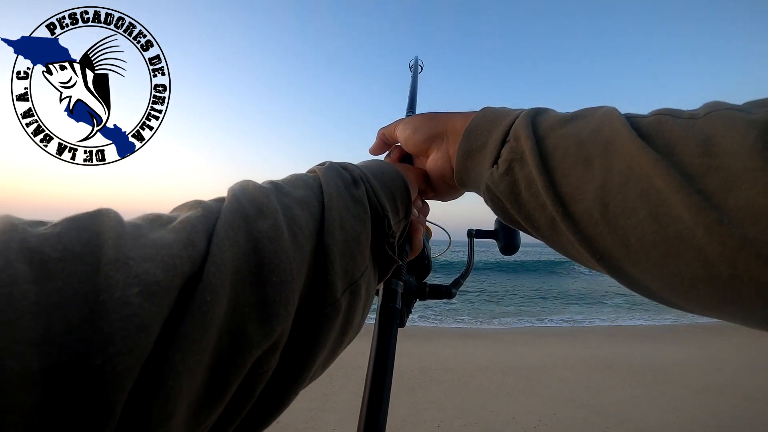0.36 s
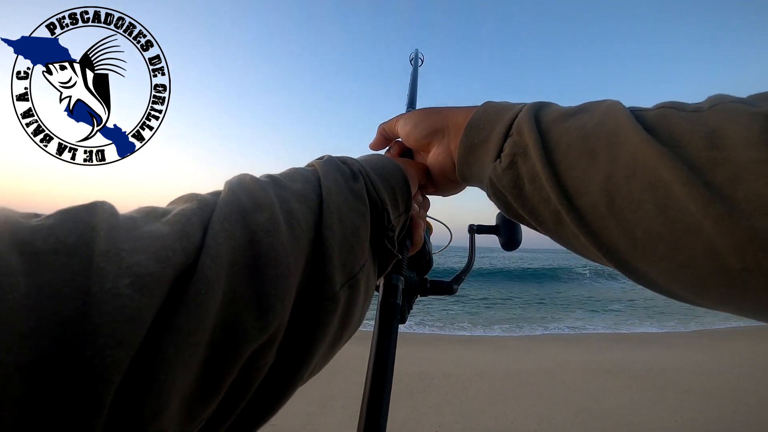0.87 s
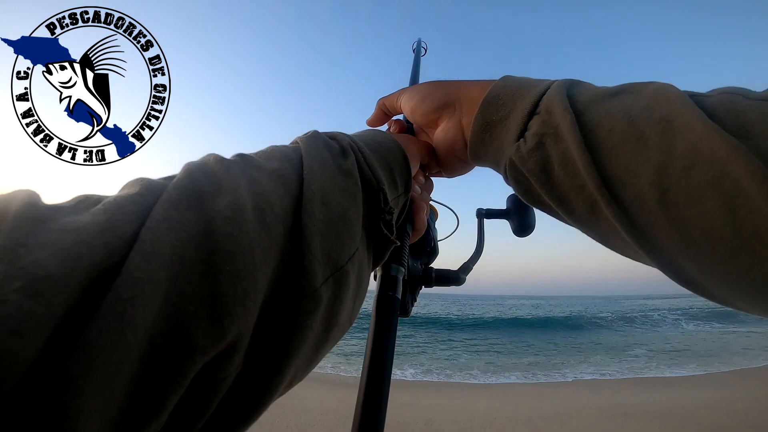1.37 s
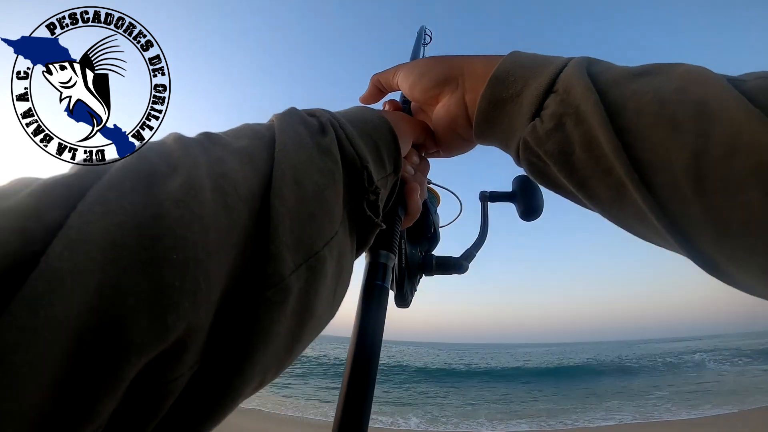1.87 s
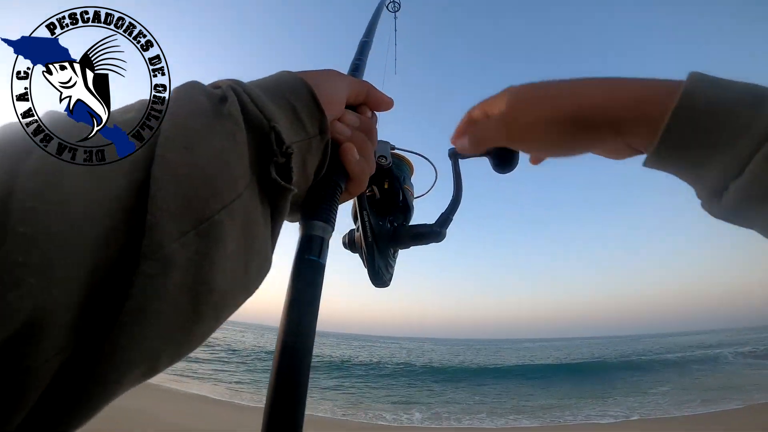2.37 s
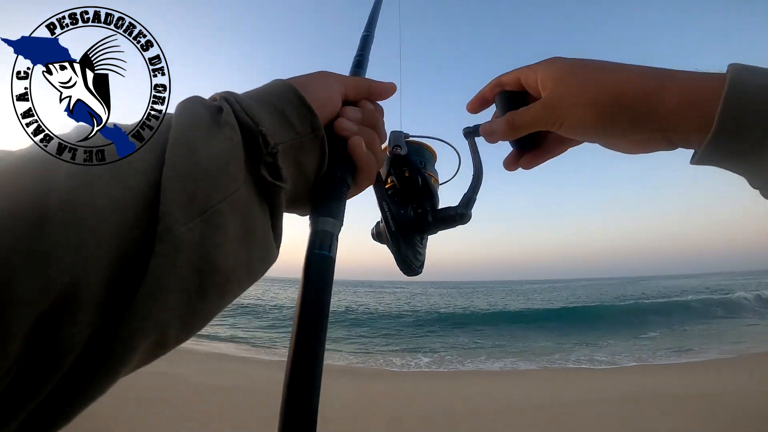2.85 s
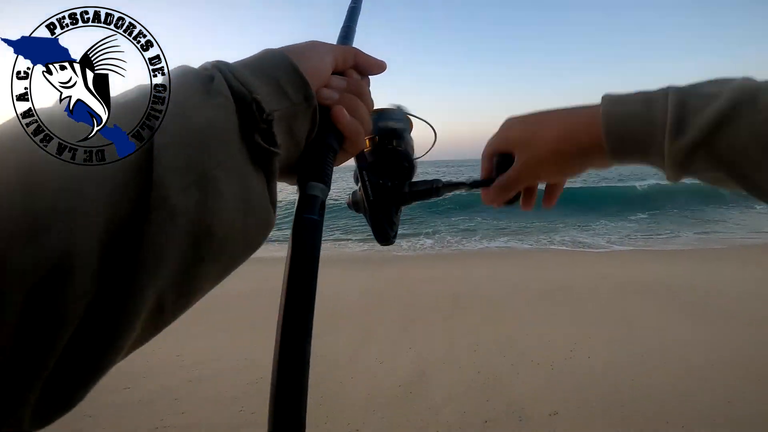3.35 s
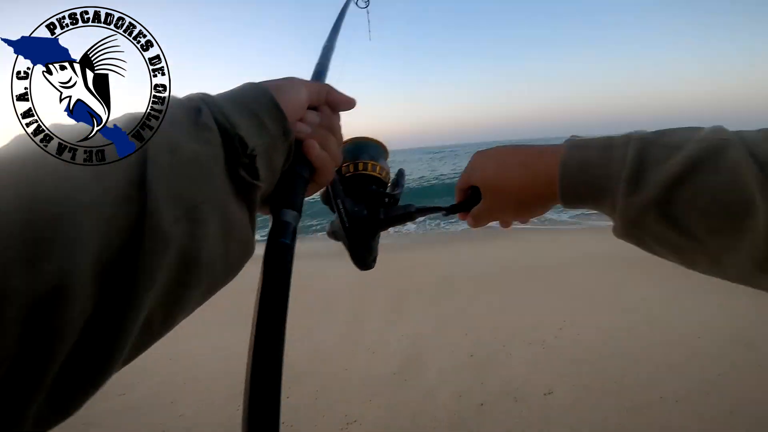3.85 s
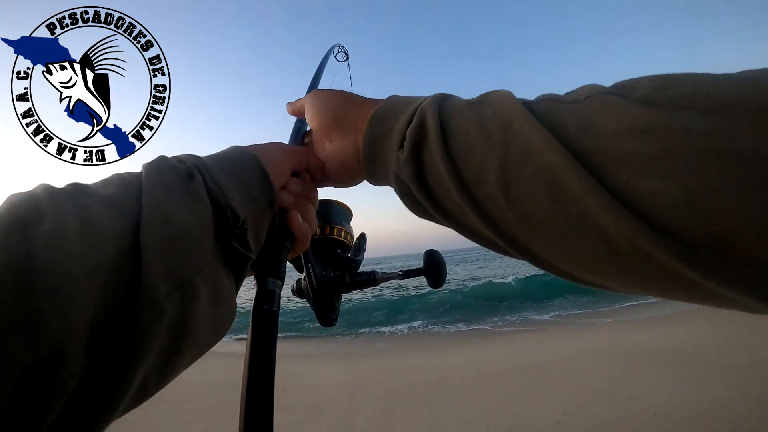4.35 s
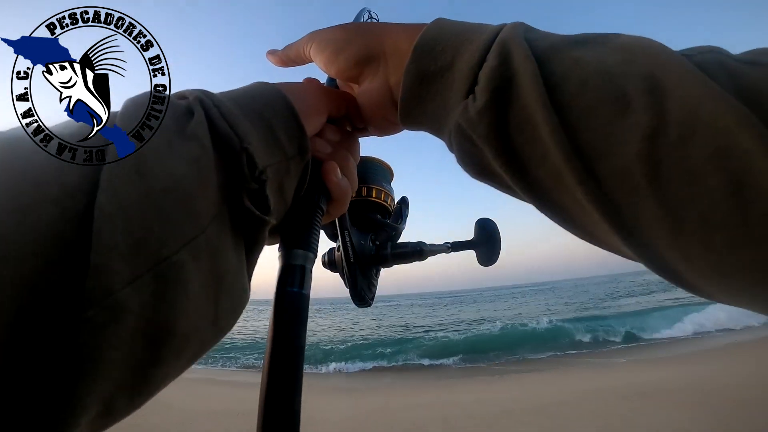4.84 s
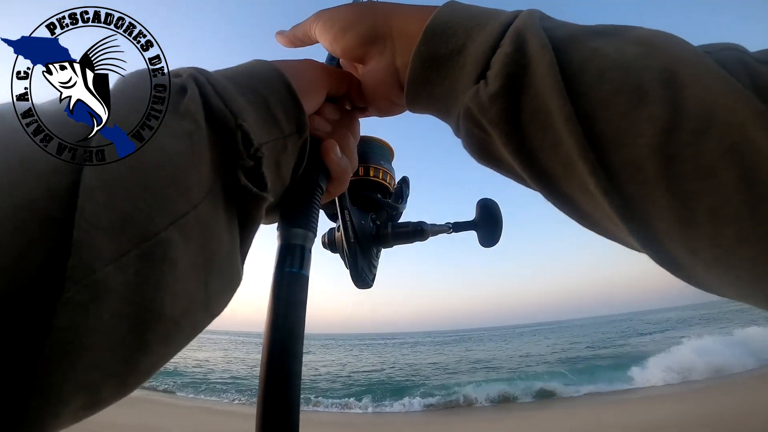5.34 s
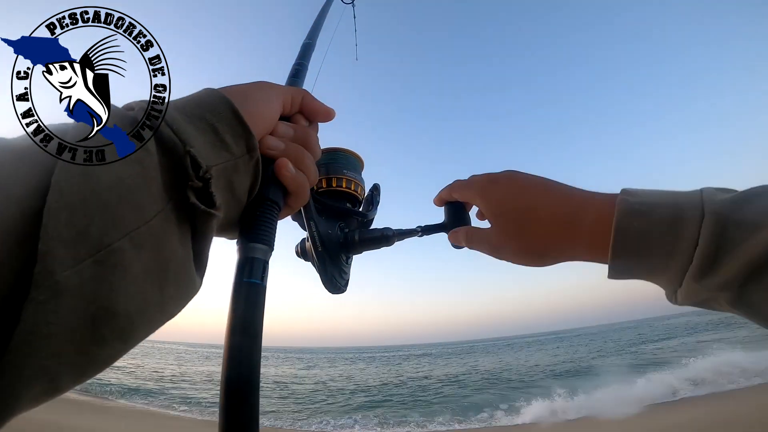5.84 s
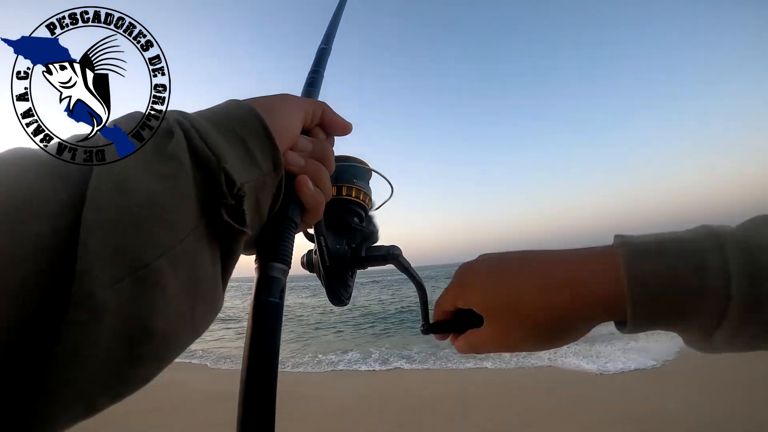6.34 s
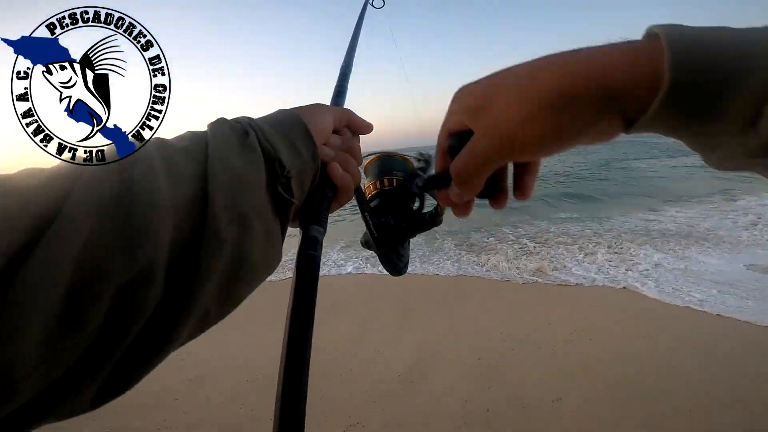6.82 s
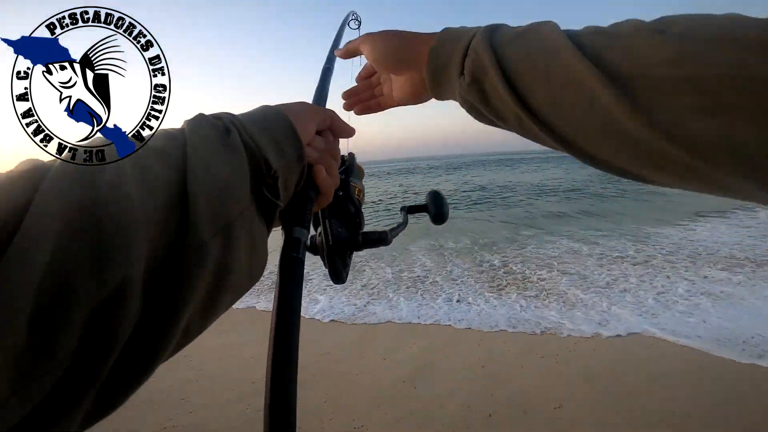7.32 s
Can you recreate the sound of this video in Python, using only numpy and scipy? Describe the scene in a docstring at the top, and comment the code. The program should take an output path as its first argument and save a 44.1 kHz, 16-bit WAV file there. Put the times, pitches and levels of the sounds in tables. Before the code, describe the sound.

On an open sandy beach, a small housed microphone sits against an angler's chest. From 0 s, far surf is a quiet, dull roar over lumpy wind rumble, with a soft low heartbeat about every 0.4 s. A thin, rough high whistle flickers until about 0.4 s. One faint tick comes at 1.4 s; from 2.1 to 2.9 s, short cloth rubs and crisp tackle clicks gather. A low bump falls at 3.3 s, then scraping, ticks and dull knocks thicken from 3.4 s, strongest around 3.8 to 4.1 s. Handling subsides while the wave swells from 4.5 s, breaking in full rushing roar and bright foam hiss around 5 to 5.8 s, almost mono. After 6 s it ebbs into fizzing wash, widening again. A soft bump comes at 6.6 s, then a final rub, faint ticks and a deeper knock near 7.6 s.

```python
"""Surf on a sandy beach, heard by a small housed camera strapped to an angler's chest.
A thin rough whistle opens over the far roar, the rumble and a fast heartbeat; these are noise and swings.
From about 2 s cloth rubs and tackle ticks: stick-slip clicks and damped rings. Knocks crowd round 3.8 s.
A wave then breaks and runs up, as noise whose spectrum follows its level curves, and ebbs after 6 s.
The stereo picture closes almost to mono while the wave is loud, then opens again."""
import sys
import numpy as np
from scipy import signal
from scipy.fft import rfft, irfft, next_fast_len
from scipy.io import wavfile
from scipy.ndimage import map_coordinates

SR = 44100
rng = np.random.default_rng(int(sys.argv[2]) if len(sys.argv) > 2 else 0)


def makeup_ratio(level_db):
    """Linear amplitude ratio for a level in decibels (20 dB per factor of ten)."""
    decades = np.asarray(level_db, float) / 20
    return 10 ** decades


def output_pcm(signal):
    """Save a mono or channel-first signal as 16-bit PCM at the path in sys.argv[1].

    Samples are clipped to [-1, 1] before scaling.
    """
    pcm = np.clip(np.atleast_2d(signal).T, -1, 1) * 32767
    wavfile.write(sys.argv[1], SR, np.round(pcm).astype(np.int16))


N = 339472   # length [samples]
PORT_LAG = 4   # shaking and ticks reach the left port this much later [samples]

# The sea, far then near, before flicker:
# (time [s], boom level near 300 Hz [dB], roar level near 1.3 kHz [dB], foam level near 10 kHz [dB])
SEA_LEVELS = [(0.0, -61.5, -46, -88.5), (0.43, -60, -49, -92.5), (1.11, -57.5, -50.5, -98.5),
              (1.84, -64, -52.5, -97), (2.19, -62, -52.5, -97.5), (2.44, -52, -53, -95),
              (2.62, -59, -47, -96.5), (2.83, -70.5, -45.5, -92.5), (2.96, -61, -45.5, -91.5),
              (3.1, -55, -48.5, -99), (3.32, -57.5, -43.5, -87.5), (3.6, -47, -39.5, -85.5),
              (3.77, -39, -41.5, -80.5), (3.99, -42.5, -41.5, -89), (4.26, -43.5, -42.5, -88.5),
              (4.6, -39, -37.5, -76), (4.9, -36.5, -37, -76), (5.07, -37, -33, -72.5),
              (5.3, -37.5, -37.5, -76), (5.47, -39.5, -32.5, -69), (5.72, -33, -32, -70.5),
              (5.85, -42.5, -38, -72), (6.3, -45, -37, -69), (6.76, -47, -43, -71),
              (6.94, -47.5, -42.5, -72.5), (7.1, -47.5, -42.5, -74.5), (7.3, -51, -47, -75),
              (7.55, -50.5, -47, -77.5), (7.7, -54, -50, -84.5)]
# Wash near 4 kHz, before flicker: (time [s], level [dB])
WASH_LEVELS = [(0.0, -52), (0.41, -55), (1.69, -57.5), (2.14, -57), (2.46, -56.5), (3.28, -52.5),
               (3.6, -40.5), (3.79, -39), (3.99, -47.5), (4.14, -53.5), (4.44, -52.5), (4.74, -47.5),
               (4.91, -49.5), (5.07, -43.5), (5.28, -48.5), (5.47, -41.5), (5.65, -41.5), (5.83, -47),
               (6.33, -46), (6.8, -52.5), (7.1, -53), (7.4, -52.5), (7.7, -51)]
# Ranges of boom, roar, wash and foam: (low edge [Hz], high edge [Hz])
SEA_RANGES = [(180, 480), (900, 2100), (2400, 6000), (8000, 13000)]
# Colour of the surf noise: (frequency [Hz], relative level per Hz [dB])
SURF_COLOUR = [(100, -2), (200, 3.5), (450, -3), (680, -15), (1000, -10), (2000, -12), (3000, -18),
               (5500, -26), (6500, -27.5), (8000, -41), (10500, -48), (13000, -53.5), (14300, -58),
               (15800, -77)]
# Resonances of the housing, negative = notch: (centre [Hz], width [Hz], height [dB])
HOUSING_MODES = [(1265, 118, 12), (1368, 33, -9.5), (1975, 270, 7), (2226, 536, -10), (3320, 110, -2),
                 (3887, 270, -6.5), (4710, 450, 4.5), (5970, 110, 5), (6640, 250, -7.5), (7220, 160, 2.5),
                 (9500, 1200, 4.5), (12300, 450, 6.5)]
# Width of the sea: (frequency [Hz], side minus mid [dB])
SEA_WIDTH = [(60, -19), (86, -24), (120, -25.5), (180, -30.5), (260, -12.5), (370, -21.5), (540, -4),
             (780, 0), (1120, -9), (1610, -6.5), (2320, 5.5), (3350, -4), (4830, 1), (6960, 1)]
# Balance of the sea: (frequency [Hz], left minus right [dB])
SEA_BALANCE = [(60, 7), (92, 3), (140, -5), (220, -0.5), (340, 0.5), (520, 1.5), (800, -4), (1240, 2.5),
               (1900, -0.5), (2930, 2), (4520, -7.5), (6960, 0)]
# How far a band of fizz stands out of the wash: (time [s], height [dB])
FIZZ_HEIGHT = [(0, 0.5), (.8, -1), (1.9, -3.5), (2.7, 1), (3.6, -7), (4.3, -0.5), (5.0, 1), (5.5, 4),
               (6.1, 1), (6.45, 2), (6.9, 6), (7.3, 5.5), (7.7, 3)]


def sea(swell_db=.4, patch_db=1.3):
    """Time-varying filtering of noise: four ranges follow the wave, and patches of spray flicker."""
    frame, hop = 1024, 256   # samples
    raw = two_ports(rng.standard_normal((2, N)))
    mid, side = coloured(raw, lambda hz: at_hz(SURF_COLOUR, hz) + bells(hz, HOUSING_MODES))
    side = coloured(side, lambda hz: at_hz(SEA_WIDTH, hz))
    hz, s, frames = signal.stft(np.array([mid, side]), SR, nperseg=frame, noverlap=frame - hop)
    power = np.abs(rfft(mid)) ** 2 * 2 / N ** 2
    fine = np.fft.rfftfreq(N, 1 / SR)
    own_db = [10 * np.log10(power[(fine > low) & (fine < high)].sum()) for low, high in SEA_RANGES]
    # each range pulls the spectrum near its centre; between centres the pull is shared
    centres = np.sqrt(np.prod(SEA_RANGES, axis=1))
    place = np.interp(np.log(hz + 1), np.log(centres), np.arange(4))
    boom, roar, foam = in_time(SEA_LEVELS, s)
    wash, = in_time(WASH_LEVELS, s)
    gain_db = 0
    for k, level in enumerate((boom, roar, wash, foam)):
        pull = np.clip(1 - abs(place - k), 0, 1)
        gain_db = gain_db + np.outer(pull, level - own_db[k])
    # the top stands out as foam gains on roar: (centre [Hz], width [Hz], height [dB per dB])
    sparkle = bells(hz, [(13500, 2200, 0.21)])
    gain_db += np.outer(sparkle, foam - roar - np.mean(foam - roar))
    gain_db += np.outer(bells(hz, [(3130, 1800, 1)]), in_time(FIZZ_HEIGHT, s)[0])
    # half-octave patches, twelve per second
    grid = np.meshgrid(2 * np.log2(hz / 50 + 1), 12.0 * s, indexing="ij")
    patches = map_coordinates(rng.standard_normal((24, 200)), grid, order=1, mode="wrap")
    gain_db += patch_db * patches
    gain_db += swell_db * drift(10.0)[np.minimum(s * SR, N - 1).astype(int)]
    shaped = signal.istft(frames * makeup_ratio(gain_db), SR, nperseg=frame, noverlap=frame - hop)[1]
    mid, side = shaped[:, :N]
    left = coloured(mid + side, lambda hz: at_hz(SEA_BALANCE, hz) / 2)
    right = coloured(mid - side, lambda hz: -at_hz(SEA_BALANCE, hz) / 2)
    return np.array([left, right])


# Strokes of cloth on the housing:
# (start [s], length [s], level before jerks [dB], brightness above 2.1 kHz [dB])
CLOTH_STROKES = [(2.274, 0.075, -51, 8), (2.416, 0.077, -40, 6.5), (2.727, 0.18, -54, 2),
                 (2.855, 0.075, -47.5, 6.5), (3.367, 0.62, -45, 7), (3.478, 0.027, -33.5, -10),
                 (3.61, 0.045, -37, -9), (3.753, .02, -37, -11), (3.79, 0.012, -25.5, -3),
                 (3.874, 0.027, -31, -8), (6.696, 0.024, -48.5, -31), (7.53, 0.06, -46, -14),
                 (7.565, 0.034, -39.5, -19)]
# Colour of the rubbing in mid, then in side: (frequency [Hz], relative level per Hz [dB])
RUB_MID_COLOUR = [(90, -40), (150, -3), (250, -4), (594, -7.5), (909, -9), (1080, -7), (1260, -8),
                  (1410, -7), (1720, -7.5), (2230, -15.5), (2700, -18), (3160, -10.5), (3810, -28),
                  (4910, -11), (5350, -32), (5820, -28.5), (7410, -58.5), (9630, -77), (16300, -120)]
RUB_SIDE_COLOUR = [(88, -62), (150, -25), (339, -34), (470, -14), (600, 6.5), (948, -8), (1210, 4),
                   (1520, -6.5), (1760, 7), (2040, -24), (2330, 0), (3800, -17), (4770, -13), (5990, -34.5),
                   (7410, -52), (9630, -74), (16300, -120)]
# Hollow tones of the mount under the drag, negative = notch: (centre [Hz], width [Hz], height [dB])
MOUNT_TONES = [(230, 70, 9), (370, 120, -7), (540, 110, 5), (820, 150, -4), (1130, 150, 7), (1750, 140, 4),
               (2500, 600, 4), (4900, 1200, -10)]
# Moan of the mount under a slow drag: (centre [Hz], width [Hz], relative level [dB])
MOAN_TONES = [(504, 88, 1), (1145, 120, -2.5)]


def rub(catches_per_s=1400, spread=2.3, hiss=.75, split_hz=2100):
    """Stick-slip friction: fibres catch and let go, nearer the right port; a fast drag is brighter."""
    sizes = makeup_ratio(spread * np.minimum(rng.exponential(1, (2, N)), 4)) * rng.choice([-1, 1], (2, N))
    clicks = rms_one(sizes * (rng.random((2, N)) < catches_per_s / SR))
    raw = two_ports(clicks + hiss * rng.standard_normal((2, N)))
    mid = rms_one(coloured(raw[0], lambda hz: at_hz(RUB_MID_COLOUR, hz) + bells(hz, MOUNT_TONES)))
    side = rms_one(coloured(raw[1], lambda hz: at_hz(RUB_SIDE_COLOUR, hz) + bells(hz, MOUNT_TONES)))
    side = side * makeup_ratio(-2.5) - 0.22 * mid   # leans right
    both = mid + side * [[1], [-1]]
    dull = coloured(both, lambda hz: -10 * np.log10(1 + (hz / split_hz) ** 8))

    gains = strokes(CLOTH_STROKES, rise_db_per_s=591, fall_db_per_s=453)
    bright_db = np.array([row[-1] for row in CLOTH_STROKES])
    moan_db = -21 - 0.836 * bright_db   # the duller the stroke, the more it moans
    level = np.sqrt(sum(g ** 2 for g in gains))
    bright = np.sqrt(sum((g * makeup_ratio(db)) ** 2 for g, db in zip(gains, bright_db)))
    slow = np.sqrt(sum((g * makeup_ratio(db)) ** 2 for g, db in zip(gains, moan_db)))

    def moan_colour(hz):
        """Resonance: a sum of peaks in amplitude."""
        peaks = [makeup_ratio(db) / (1 + (2 * (hz - centre) / width) ** 2) for centre, width, db in MOAN_TONES]
        return 20 * np.log10(sum(peaks))

    moan = rms_one(coloured(raw[0] + 0.93 * raw[1] * [[1], [-1]], moan_colour))
    jerks = makeup_ratio(1.6 * drift(120))   # dB, knots per second
    return jerks * (level * dull + bright * (both - dull) + slow * moan)


# Small ticks of buckle and tackle:
# (time [s], nominal level before the tone filter and port balance [dB], pitch [Hz], ring t60 [s])
TACKLE_TICKS = [(1.368, -33, 1280, 0.025), (1.3685, -44, 600, 0.023), (2.113, -28, 5600, 0.0072),
                (2.215, -29.5, 4780, 0.022), (2.3277, -20.5, 2850, 0.0039), (2.404, -32, 3100, 0.0065),
                (2.413, -27, 1260, 0.013), (2.428, -25.5, 1160, 0.013), (2.4285, -28, 2950, 0.01),
                (2.437, -23, 1650, 0.012), (2.458, -24, 2660, .012), (2.474, -27, 990, .015),
                (2.483, -30, 3200, 0.01), (2.486, -24, 1600, .01), (2.857, -29, 2980, 0.0053),
                (2.921, -29, 1470, 0.012), (3.472, -26, 1210, .015), (3.487, -25, 1140, 0.017),
                (3.5, -27.5, 1820, 0.04), (3.6435, -34, 1600, .015), (3.7926, -35, 3080, 0.0088),
                (3.798, -24.5, 1804, 0.04), (3.8, -34, 3250, .04), (3.8725, -26, 540, 0.019),
                (3.8731, -20, 1120, 0.015), (3.881, -41, 3150, 0.14), (3.896, -20, 1830, .012),
                (3.907, -20.5, 1600, .015), (3.9805, -21, 2060, 0.0091), (4.966, -37, 2500, .006),
                (7.578, -39, 1080, 0.074), (7.603, -35, 1230, 0.036)]


def ticks(contact_s=0.0005, crack_db=-11, crack_t60_s=.004):
    """Damped modal ringing: a main mode, weaker partners above and below, and a crack of noise."""
    out, t = np.zeros(N + SR), np.arange(SR // 10) / SR
    onset = 1 - np.exp(-(t / contact_s) ** 2)
    for s, db, hz, t60 in TACKLE_TICKS:
        modes = ((1, 0.72), (2.1, 0.18), (0.63, 0.16))   # (frequency ratio, amplitude)
        ring = sum(share * np.sin(2 * np.pi * hz * ratio * t) for ratio, share in modes)
        crack = makeup_ratio(crack_db - 60 * t / crack_t60_s) * rng.standard_normal(len(t))
        at = round(s * SR)
        out[at:at + len(t)] += makeup_ratio(db) * (makeup_ratio(-60 * t / t60) * ring + crack) * onset
    # tone filter: (frequency [Hz], gain [dB])
    tick = coloured(out[:N], lambda hz: at_hz([(5500, 3.5), (8000, -19.0), (16000, -77)], hz))
    return np.array([np.roll(tick, PORT_LAG), tick]) * makeup_ratio([[-2.], [2.]])


# Knocks of arm and rod against the harness; the rows at 2.501 s and 3.3185 s instead add to the # heartbeats
# there, a higher swing at 2.501 s and a deeper one at 3.3185 s: # (time [s], peak level before port balance
# [dB], frequency [Hz], nominal length [ms])
HARNESS_KNOCKS = [(2.501, -26, 87, 11), (2.558, -20, 15.5, 64), (3.3185, -14, 26.5, 37),
                  (3.4087, -22.5, 60, 10), (3.615, -13, 43, 17), (3.638, -18, 51, 9.2),
                  (3.651, -17, 87, 17), (3.6706, -17, 93, 12), (3.695, -22, 55, 6),
                  (3.7994, -10.5, 92, 6.3), (3.808, -11.5, 96, 7.3), (3.8185, -6.5, 93, 4.4),
                  (3.8242, -8.5, 75, 8.8), (3.8798, -7, 80, 12), (3.964, -19, 27, 24),
                  (4.0452, -13.5, 80, 4.1), (4.054, -14.5, 75, 10.6), (4.153, -22.5, 122, 16),
                  (4.295, -27.5, 68, 16), (4.6733, -24, 48, 19), (5.8621, -26, 39, 9.4),
                  (6.5684, -19.5, 34, 13), (7.679, -12, 68.8, 35)]


def knocks():
    """Transient excitation: each row gives a short low swing."""
    return thumps(HARNESS_KNOCKS)


# The wearer's heart, felt through the strap: (time [s], peak level before port balance [dB])
HEARTBEATS = [(.0704, -33), (0.476, -29), (0.885, -28.5), (1.2853, -27.5), (1.689, -24), (2.097, -20),
              (2.5, -26.5), (2.9023, -27), (3.318, -27), (3.711, -19), (4.516, -28.5), (4.9118, -29.5),
              (5.312, -23), (5.715, -22), (6.1113, -22.5), (6.5236, -22), (6.912, -31)]


def heart():
    """Structure-borne pulse: every beat is the same soft low swing, at its own level."""
    hz, nominal_ms = 41.2, 15
    return thumps([(s, db, hz, nominal_ms) for s, db in HEARTBEATS], rise_cycles=0.67, fall=0.59)


def thumps(rows, rise_cycles=0.19, fall=0.54):
    """Pulsed oscillation: a low cosine under a Gaussian that usually rises faster than it falls."""
    out, span = np.zeros(N + SR), np.arange(-SR // 10, SR // 10) / SR
    for s, db, hz, ms in rows:
        spread_s = np.where(span < 0, rise_cycles / hz, fall * ms / 1000)
        shape = np.exp(-.5 * (span / spread_s) ** 2)
        start = round(s * SR) + len(span) - len(span) // 2
        out[start:start + len(span)] += makeup_ratio(db) * shape * np.cos(2 * np.pi * hz * span)
    return out[len(span):len(span) + N]


# A thin rough whistle: (start [s], length [s], level before port balance [dB])
WHISTLE_NOTES = [(-.01, 0.022, -46.5), (.06, .04, -69), (.175, .03, -66), (.26, 0.087, -55),
                 (3.245, 0.04, -57)]


def whistle(wobble_hz=55.0, steady=1.7, flutter_db=2.5, wobbles_per_s=220.0, flutters_per_s=90.0):
    """Random frequency and amplitude modulation: a rough tone inside a narrow band of noise."""
    centre_hz, width_hz = 3313, 150
    noise = coloured(rng.standard_normal(N),
                     lambda hz: -20 * np.log10(1 + (2 * (hz - centre_hz) / width_hz) ** 2))
    phase = 2 * np.pi * np.cumsum(centre_hz + wobble_hz * drift(wobbles_per_s)) / SR
    tone = np.sqrt(2) * np.sin(phase)
    rough = rms_one((rms_one(noise) + steady * tone) * makeup_ratio(flutter_db * drift(flutters_per_s)))
    notes = sum(strokes(WHISTLE_NOTES, rise_db_per_s=350, fall_db_per_s=190))
    return notes * rough * makeup_ratio([[3.], [-3.]])


# Wind and body rumble on the housing, before port balance:
# (time [s], drone level near 110 Hz [dB], buffet level under 55 Hz [dB])
RUMBLE_LEVELS = [(0.0, -39.5, -42.5), (0.43, -43, -52), (0.7, -41.5, -48.5), (1.33, -40, -46),
                 (1.86, -45.5, -42), (2.2, -43.5, -40.5), (2.5, -40.5, -40), (2.8, -45.5, -33),
                 (3.21, -42.5, -36.5), (3.47, -32, -34.5), (3.84, -35, -26), (4.2, -37.5, -35),
                 (4.46, -43, -58), (4.82, -39, -41), (5.1, -44, -44), (5.79, -35, -29.5),
                 (6.26, -45.5, -39), (6.6, -41, -35), (7.18, -37.5, -39.5), (7.7, -34, -39)]
# Colours of drone and buffet: (frequency [Hz], relative level per Hz [dB])
DRONE_COLOUR = [(50, -9.5), (75, 1.5), (110, 3), (135, -4.5), (170, -9.5), (260, -28.5)]
BUFFET_COLOUR = [(12, -5.5), (25, -4.5), (50, -15), (80, -35), (150, -37)]


def rumble(lump_db=2.6, lumps_per_s=18.0):
    """Amplitude-modulated low noise: a lumpy drone and a deeper buffet, nearly alike on both ports."""
    out = 0
    for level, colour in zip(in_time(RUMBLE_LEVELS), (DRONE_COLOUR, BUFFET_COLOUR)):
        noise = rng.standard_normal((2, N))
        mid, side = coloured(noise, lambda hz: at_hz(colour, hz) - 80 * (hz > 400))
        both = mid + makeup_ratio(-20.5) * side * [[1], [-1]]
        out = out + makeup_ratio(level) * rms_one(both * makeup_ratio(lump_db * drift(lumps_per_s)))
    return out


# Share of the side signal that is the mid sound reaching one port earlier:
# (frequency [Hz], share [1], + left first, - right first)
PORT_SHARE = [(520, .6), (770, -.7), (1000, -.5), (1270, .5), (1620, .6), (1950, -.7), (3600, -.6),
              (4500, .6)]


def two_ports(raw):
    """Partial coherence: side is partly mid a quarter cycle ahead or behind, partly unrelated."""
    share = at_hz(PORT_SHARE, np.fft.rfftfreq(N, 1 / SR))
    side = 1j * share * rfft(raw[0]) + np.sqrt(1 - share ** 2) * rfft(raw[1])
    return np.array([raw[0], irfft(side, N)])


def strokes(rows, rise_db_per_s, fall_db_per_s):
    """Exponential rise and decay: one gain per row of (start [s], length [s], level [dB])."""
    t = np.arange(N) / SR
    gains = []
    for s, length, db, *_ in rows:
        rise = rise_db_per_s * np.maximum(s - t, 0)
        fall = fall_db_per_s * np.maximum(t - s - length, 0)
        gains.append(makeup_ratio(db - rise - fall))
    return gains


def bells(hz, modes):
    """Resonance: bell-shaped peaks and notches in dB."""
    return sum(db / (1 + (2 * (hz - centre) / width) ** 2) for centre, width, db in modes)


def coloured(x, db_of_hz):
    """Linear filtering: multiply the spectrum by a gain given in dB against frequency."""
    size = next_fast_len(N)
    return irfft(rfft(x, size) * makeup_ratio(db_of_hz(np.fft.rfftfreq(size, 1 / SR))), size)[..., :N]


def drift(rate):
    """Random modulation: chance values, rate per second, joined by straight lines."""
    knots = rng.standard_normal(int(N / SR * rate) + 2)
    return np.sqrt(2) * map_coordinates(knots, [np.arange(N) * rate / SR], order=1)


def rms_one(x):
    """Power normalisation: scale to unit rms."""
    return x / np.sqrt(np.mean(x ** 2) + 1e-20)


def in_time(rows, s=None):
    """Linear interpolation: columns of a curve table at every sample, or at the times s."""
    at, *columns = np.transpose(rows)
    return [np.interp(np.arange(N) / SR if s is None else s, at, c) for c in columns]


def at_hz(points, hz):
    """Logarithmic frequency scale: a spectrum table read between its points."""
    points = np.array(points)
    return np.interp(np.log(hz + 1), np.log(points[:, 0]), points[:, 1])


def scene():
    """Superposition: sea and cloth are wide; what comes through the strap sits near the middle."""
    body = (rumble() + heart() + knocks()) * makeup_ratio([[.5], [-.5]])
    body[0, PORT_LAG:] = body[0, :-PORT_LAG].copy()
    return sea() + rub() + ticks() + body + whistle()


# The stereo picture narrows and reopens: (time [s], side gain in the lows [dB])
SIDE_GAIN = [(0, -0.5), (3.97, 0.5), (4.3, -17.5), (5, -37.5), (6.1, -34.5), (6.3, -22), (6.9, -10.5),
             (7.7, -5)]


def narrowed(dry):
    """Mid-side stereophony: the side gain acts fully on the lows and by half its dB on the treble."""
    mid, side = (dry[0] + dry[1]) / 2, (dry[0] - dry[1]) / 2
    low_db, = in_time(SIDE_GAIN)
    low = coloured(side, lambda hz: -10 * np.log10(1 + (hz / 3600) ** 4))
    side = low * makeup_ratio(low_db) + (side - low) * makeup_ratio(0.5 * low_db)
    return np.array([mid + side, mid - side])


def band_limit(x):
    """A steep low-pass at the top of the band."""
    return signal.sosfilt(signal.butter(12, 15800, fs=SR, output="sos"), x)


def record(dry):
    """Signal chain: the stereo picture is narrowed and the finished mix passed on."""
    mix = narrowed(dry)
    return band_limit(mix)


dry = scene()
out = record(dry)
output_pcm(out)
```